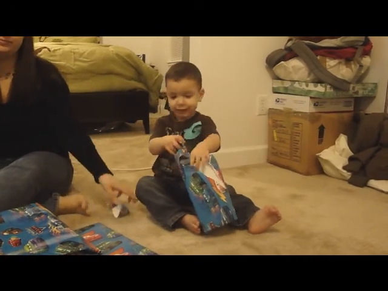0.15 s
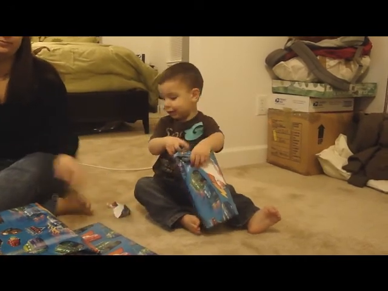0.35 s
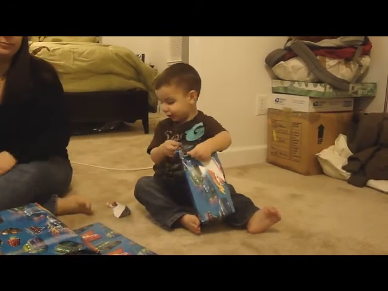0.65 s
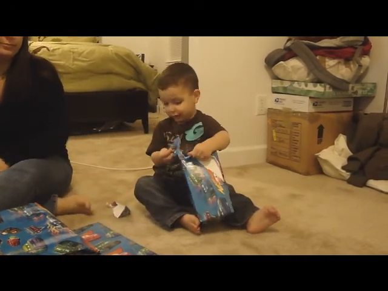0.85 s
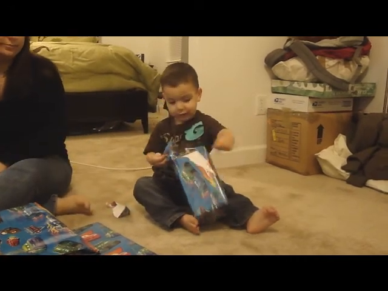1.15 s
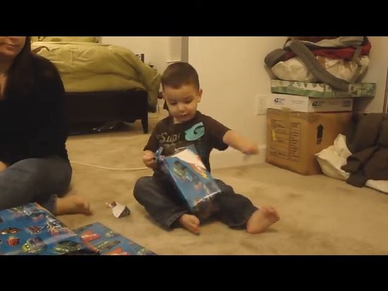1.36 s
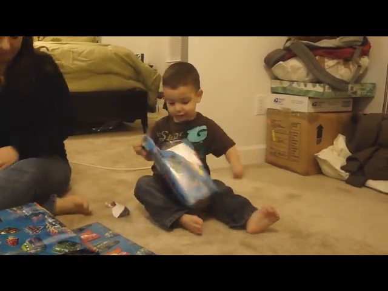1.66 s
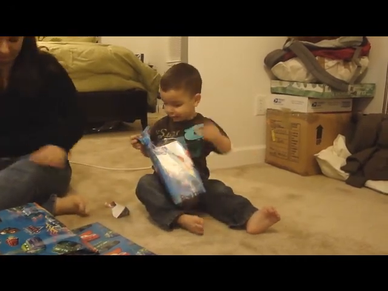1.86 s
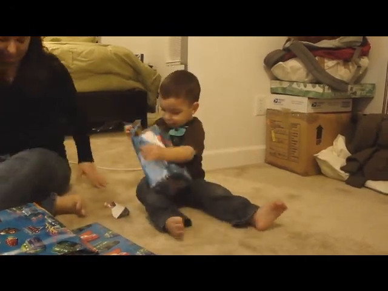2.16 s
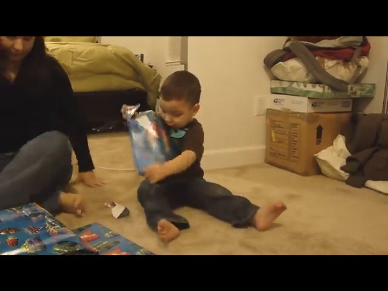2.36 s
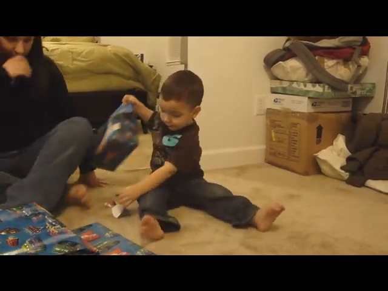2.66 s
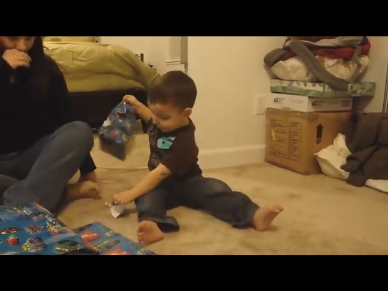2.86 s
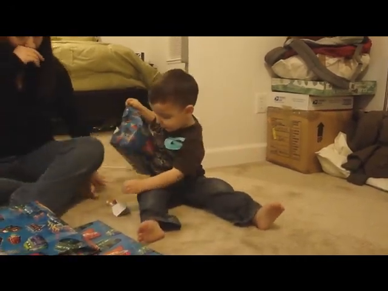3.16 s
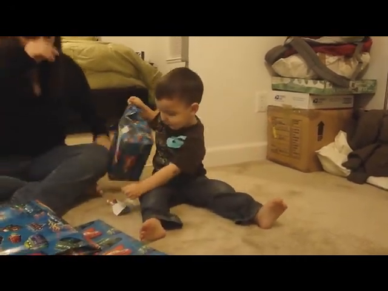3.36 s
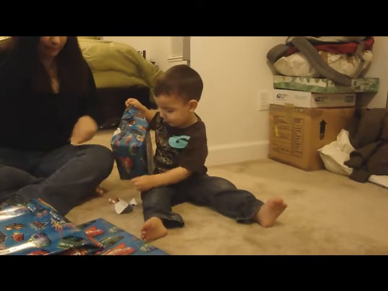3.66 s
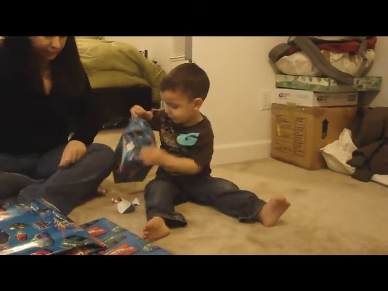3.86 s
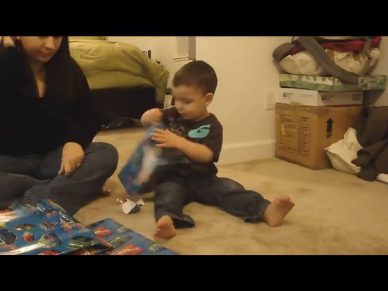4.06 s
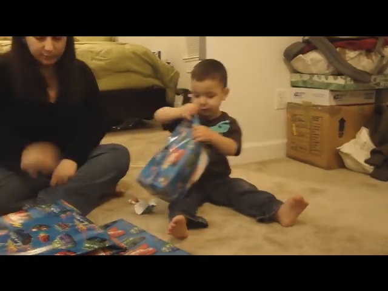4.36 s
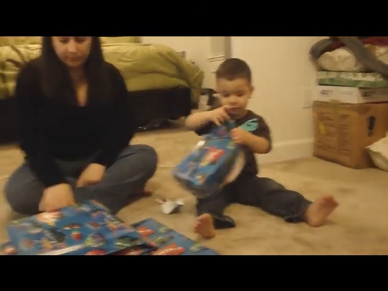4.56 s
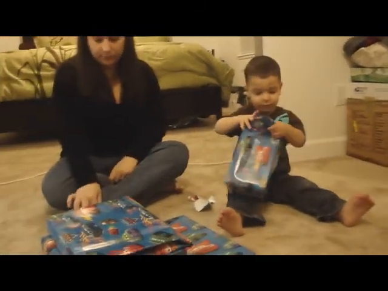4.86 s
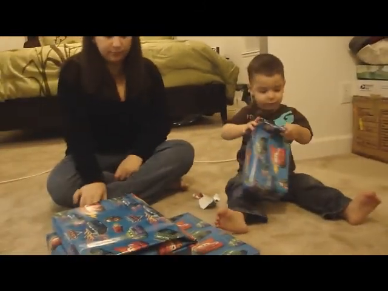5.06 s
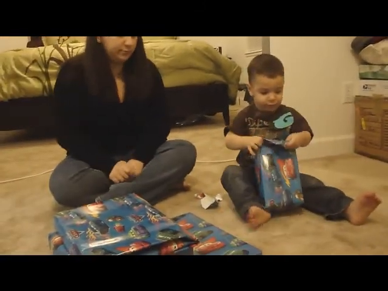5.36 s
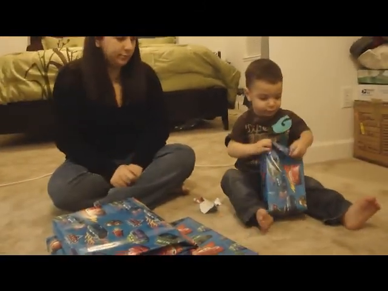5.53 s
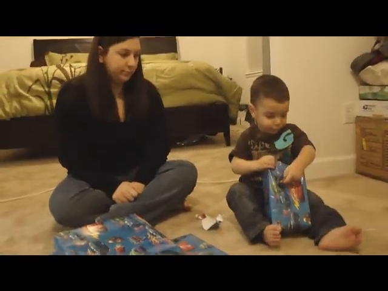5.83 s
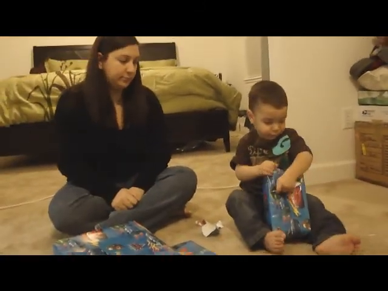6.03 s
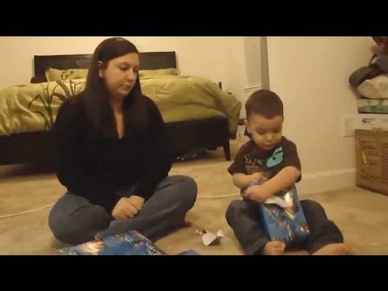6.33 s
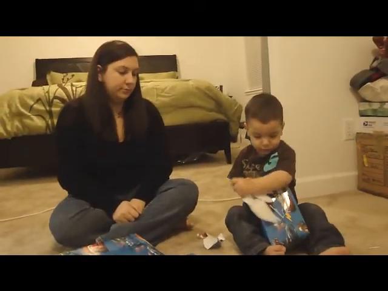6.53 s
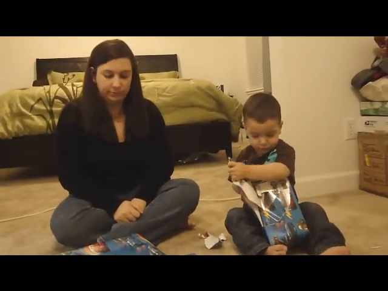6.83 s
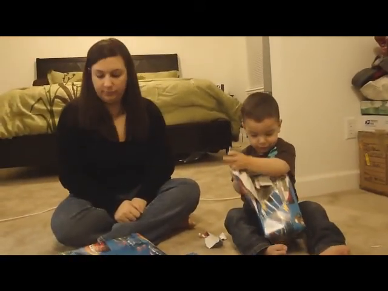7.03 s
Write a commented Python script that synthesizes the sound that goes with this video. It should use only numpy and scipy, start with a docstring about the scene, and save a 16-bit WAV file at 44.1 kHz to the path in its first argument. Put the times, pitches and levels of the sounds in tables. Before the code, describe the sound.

In a small carpeted bedroom, stiff wrapping paper is worked off a cardboard box about two metres from a small microphone. Sharp snaps and a short bright rip come in the first second or so, then sparse quiet crinkles and box knocks, then busier creasing that builds into dense, fizzing tears at the end. Faint room hiss lies beneath.

```python
"""Tearing gift paper off a box

A carpeted bedroom: paper is pulled, crinkled and torn off a cardboard box, two metres from a camera's microphone.
Single creases snap as short noise jolts with a ringing patch, over a crackle of many small noise ticks.
The box booms under the paper as dull crackle, and knocks ring its walls as decaying sines.
The room answers after a short gap with echoes and a sparse tail; quiet air is filtered noise."""
import sys
import numpy as np
from scipy import signal
from scipy.fft import rfft, irfft, next_fast_len
from scipy.io import wavfile
from scipy.ndimage import uniform_filter1d

SR = 44100
rng = np.random.default_rng(int(sys.argv[2]) if len(sys.argv) > 2 else 0)


def digitize_waveform(pressure):
    """Quantize a signal to 16-bit integers and store it at the path in sys.argv[1].

    Rows of a 2-D input are taken as channels; values are limited to [-1, 1].
    """
    field = np.atleast_2d(pressure).T
    bounded = np.clip(field, -1, 1)
    quanta = np.round(bounded * 32767).astype(np.int16)
    wavfile.write(sys.argv[1], SR, quanta)


def decibels_to_gain(level_db):
    """Convert a level in decibels to a linear amplitude gain (20 dB per decade)."""
    exponent = np.asarray(level_db, float) / 20
    return 10 ** exponent


N = 317079  # length in samples


def evened(x):
    """Scales to rms 1."""
    return x / np.sqrt(np.mean(x ** 2) + 1e-20)


def peaked(x):
    """Scales to peak 1."""
    return x / abs(x).max()


def read(points, hz):
    """Reads a table on a log-frequency axis."""
    f, value = np.transpose(points)
    return np.interp(np.log(hz + 1), np.log(f + 1), value)


def add(mix, s, sound):
    """Mixes a sound in at a time in seconds."""
    part = mix[round(s * SR):][:len(sound)]
    part += sound[:len(part)]


def coloured(x, points):
    """Filters by a spectrum table."""
    size = next_fast_len(len(x))
    gain = decibels_to_gain(read(points, np.fft.rfftfreq(size, 1 / SR)))
    return irfft(rfft(x, size) * gain, size)[:len(x)]


def burst(noise, t60):
    """A sudden release: noise that starts within 0.17 ms and dies."""
    t = np.arange(len(noise)) / SR
    return noise * decibels_to_gain(-60 * t / t60) * np.minimum(t / 0.00017, 1)


def ring(x, hz, width):
    """One resonance of gain 1 at its pitch: shifted to 0 Hz, smoothed, shifted back."""
    turn = np.exp(2j * np.pi * hz * np.arange(len(x)) / SR)
    r = np.exp(-np.pi * width / SR)
    return 2 * (turn * signal.lfilter([1 - r], [1, -r], x / turn)).real


# the hands at work on the paper, levels before the flurries are added:
# start_s [s], sheet_db (crackle of the sheet) [dB], rustle_db (carried by the box) [dB],
# fizz_db (fine fizz of tearing fibres) [dB]
HANDS = [(0.0, -39, -44.5, -47.5), (0.46, -54, -52, -55), (0.56, -48.5, -54, -58), (0.78, -46, -49.5, -57),
         (0.92, -48, -42.5, -51), (1.04, -32.5, -43.5, -34), (1.34, -55.5, -53, -59), (1.64, -54, -57, -66),
         (1.96, -52, -54.5, -58.5), (2.18, -42, -47, -46.5), (2.44, -43, -46, -60), (2.62, -44, -46, -68),
         (2.76, -56, -62, -66), (3.0, -48.5, -45, -57), (3.18, -44.5, -51, -64), (3.36, -54.5, -54.5, -70),
         (3.54, -53, -52.5, -66), (3.96, -58, -66.5, -67), (4.16, -59, -50, -60), (4.31, -39, -45.5, -49),
         (4.44, -45.5, -47.5, -59), (4.93, -48.5, -56, -53), (5.17, -49, -51, -55),
         (5.41, -43.5, -46.5, -56), (5.77, -44.5, -53.5, -50), (5.89, -32, -40, -36),
         (6.03, -40.5, -49, -46), (6.15, -36.5, -54, -41), (6.27, -34, -43.5, -39), (6.47, -33.5, -40, -29),
         (6.57, -31, -37.5, -29), (6.81, -41.5, -47, -46), (7.03, -41.5, -51, -46), (7.19, -28, -40, -30.5)]


def hands():
    """Levels of sheet, box and fibres as the hands work the paper, gliding between table rows."""
    s, *levels = np.transpose(HANDS)
    return np.array([np.interp(np.arange(N) / SR, s, level) for level in levels])


# share of the flurry in box and fibres, swelling and dying time
FLURRY_BOX_DB, FLURRY_FIZZ_DB, FLURRY_RISE_S, FLURRY_T60_S = 1.5, -1, 0.0029, 0.29
FLURRY_ALIKE = 0.51  # how far the flurry takes on the colour of its snap, 0 to 1


def flurries():
    """Power in sheet, box and fibres that swells just after each placed snap, in its colour, and dies away."""
    kicks = np.zeros((3, N))
    for s, db, hz, low_db, high_db, flurry_db in PLACED_SNAPS:
        box_db = FLURRY_BOX_DB + FLURRY_ALIKE * low_db
        fizz_db = FLURRY_FIZZ_DB + FLURRY_ALIKE * high_db
        colour_db = np.array([0, box_db, fizz_db])
        kicks[:, round(s * SR)] += decibels_to_gain(db + flurry_db + colour_db) ** 2
    dying = signal.lfilter([1], [1, -decibels_to_gain(-120 / (FLURRY_T60_S * SR))], kicks)
    keep = np.exp(-1 / (FLURRY_RISE_S * SR))
    return signal.lfilter([1 - keep], [1, -keep], dying)


def crackle(per_s, spread_db, clump_db, t60, ring_share, count=32):
    """Countless small creases, in clumps; each patch of paper has its own ring."""
    clumps = evened(uniform_filter1d(uniform_filter1d(rng.standard_normal(N), 300), 300))
    size = decibels_to_gain(spread_db * np.minimum(rng.exponential(1, N), 4) + clump_db * clumps)
    size *= rng.random(N) < per_s / SR
    patch = rng.integers(0, count, N)
    share = np.clip(ring_share, 0, 1)
    out = np.zeros(N)
    for k, hz in enumerate(np.geomspace(250, 10000, count)):
        tick = burst(rng.standard_normal(600), t60)  # cut off after 14 ms
        ringing = ring(tick, 4000 * (hz / 4000) ** 0.62, 700)  # pitches drawn in towards 4 kHz
        tick = (1 - share) * evened(tick) + share * evened(ringing)
        out += signal.oaconvolve(size * (patch == k), evened(tick))[:N]
    return out


# colour of the crackle off the sheet: pitch_hz [Hz], level_db per Hz [dB]
SHEET_COLOUR = [(700, -100), (1200, -18.5), (1700, 0), (2500, 3), (3500, 3.5), (4500, 3), (6000, -7.5)]
# colour of the rustle carried by the box: pitch_hz [Hz], level_db per Hz [dB]
RUSTLE_COLOUR = [(60, -57), (120, -11), (200, 1), (350, 7.5), (700, 6.5), (1200, 9), (1700, -1.5),
                 (2500, -91)]
# colour of the fizz of tearing fibres: pitch_hz [Hz], level_db per Hz [dB]
FIZZ_COLOUR = [(3000, -35.5), (4500, 0), (5500, 5), (7000, 3), (9000, 3), (11000, -4), (13000, -24)]
# a strong pull rips fibres so fast that their fizz turns dense and even
TEAR_FROM_DB, TEAR_SPAN_DB = -42, 10


def handling():
    """Fine crackle of the sheet, fizz of fibres that turns dense in tearing, and duller, longer crackle of the box."""
    levels = hands()
    sheet, rustle, fizz = np.sqrt(decibels_to_gain(levels) ** 2 + flurries())
    fine = evened(crackle(per_s=2500, spread_db=2.0, clump_db=2.0, t60=0.0068, ring_share=0.56))
    dense = evened(crackle(per_s=7400, spread_db=5.0, clump_db=1.2, t60=0.0057, ring_share=0.4, count=12))
    longer = evened(crackle(per_s=700, spread_db=6.5, clump_db=3.5, t60=0.056, ring_share=0, count=12))
    tearing = np.clip((levels[2] - TEAR_FROM_DB) / TEAR_SPAN_DB, 0, 1)
    fibres = np.sqrt(1 - tearing) * fine + np.sqrt(tearing) * dense
    box = fine + 1.14 * longer
    return (sheet * evened(coloured(fine, SHEET_COLOUR))
            + fizz * evened(coloured(fibres, FIZZ_COLOUR))
            + rustle * evened(coloured(box, RUSTLE_COLOUR)))


# colour of the quiet room: pitch_hz [Hz], level_db per Hz [dB]
AIR_COLOUR = [(25, -17), (60, -13), (100, -9.5), (120, -0.5), (140, -5.5), (250, -0.5), (600, -3.5),
              (2000, -8), (4000, -6), (11000, -21.5)]


def air():
    """Steady hiss of the room and the microphone: filtered noise at rms -54 dB."""
    return decibels_to_gain(-54) * evened(coloured(rng.standard_normal(N), AIR_COLOUR))


# dying time of the bedroom: pitch_hz [Hz], t60_s [s]
ROOM_T60 = [(250, 0.53), (800, 0.27), (2500, 0.2), (6000, 0.044), (11000, 0.16)]
# first echoes off the walls: usual delay_s [s], level_db [dB]
WALL_ECHOES = [(.0022, -65), (.0086, -17), (0.0132, -13.5), (0.018, -28.5)]


def tail():
    """A few wall echoes, and sparse taps whose bands die at their own speed."""
    taps = np.zeros(SR // 2)
    at = np.arange(380, SR // 2 - 20, 20)  # the gap before the tail is about 9 ms
    taps[at + rng.integers(0, 20, len(at))] = rng.choice([-1., 1.], len(at))
    hz, t, z = signal.stft(taps, SR, nperseg=256)
    dying = decibels_to_gain(-60 * t / read(ROOM_T60, hz)[:, None])
    out = signal.istft(z * dying, SR, nperseg=256)[1]
    out *= decibels_to_gain(-9.5) / np.linalg.norm(out)
    for s, db in WALL_ECHOES:
        out[round(s * SR * rng.uniform(.93, 1.07))] += decibels_to_gain(db)
    return out


def room(x, count=5):
    """Creases break all over the moving sheet, so each moment reaches the walls by other paths."""
    turn = np.arange(N) / SR / .045  # fades to the next tail every 45 ms
    out = np.zeros(N)
    for k in range(count):
        away = (turn - k + count / 2) % count - count / 2
        fade = np.cos(np.pi / 2 * np.clip(away, -1, 1))
        out += signal.fftconvolve(x * fade, tail())[:N]
    return out


# single creases placed by time, loud and faint: start_s [s], peak_db of the jolt before the box push [dB],
# pitch_hz of the freed patch [Hz], low_db (push on the box, mostly under 1.5 kHz, against the jolt) [dB],
# high_db (over 5.5 kHz, against the ringing sheet) [dB], flurry_db (crackle set off, against the jolt) [dB]
PLACED_SNAPS = [(0.0564, -15, 3180, -26, -9.5, -22), (0.0847, -6.5, 6050, -44, -10, -36),
                (0.2504, -20.5, 2730, -8, -10, -20.5), (0.2984, -17.5, 2980, -25, -1, -17),
                (0.3171, -12, 2860, -29, -5, -18.5), (0.3503, -11.5, 3100, -32, -12, -24),
                (0.3709, -7, 2900, -16, -1.5, -23), (0.4364, -17, 2460, -12, -7, -18),
                (0.4678, -18, 5050, -26, -20, -19.5), (0.4894, -23, 4320, -18, -19, -26),
                (0.5242, -17, 2160, -18, -7, -19), (0.5922, -19, 2200, -11, -4, -36),
                (0.713, -18, 3930, -13.5, -11, -18), (0.7545, -13.5, 3700, -22, -12, -23),
                (0.8034, -15.5, 3730, -9, -4, -21), (0.8103, -10, 3080, -23, -6, -41),
                (0.849, -16, 5850, -21, -9, -20), (0.8595, -18, 4130, -16, -10, -26),
                (0.907, -10, 1580, -27, 0, -24.5), (0.9349, -15, 1440, -24, -20, -31),
                (0.9732, -9, 4540, -25, -17, -27), (0.981, -23, 1800, -12, -9, -28),
                (1.0108, -5.5, 5860, -22, -15, -20), (1.0804, -6.5, 5390, -24, -4, -28),
                (1.0884, -10, 5310, -22, -9, -40), (1.0989, -9.5, 6200, -27, -10, -40),
                (1.2072, -26, 4060, -14, -13, -17), (1.2164, -20.5, 3400, -15, -11, -20.5),
                (1.3132, -14, 5200, -26, -18, -28), (1.3404, -20.5, 6190, -26, -20, -30),
                (1.3977, -29, 5060, -7, -23, -21), (1.4127, -30, 3820, -21, -22, -24),
                (1.5429, -21, 5700, -21, -4, -23), (1.5974, -27, 5380, -18, -15, -26),
                (1.645, -16, 5700, -21, -11, -27), (1.6846, -18, 2090, -15, -21, -20),
                (1.7192, -18.5, 3830, -9, -36, -32), (1.8507, -22.5, 2010, -31, -9, -28),
                (1.8896, -29, 2960, -13, -23, -31), (1.941, -23.5, 3380, -20, -1, -32),
                (1.9894, -15, 4050, -37, -10, -29), (2.0154, -21, 4560, -23, 4, -30),
                (2.0328, -17.5, 5530, -14, -8, -25), (2.148, -20, 4770, -23, -4, -35),
                (2.2114, -38, 3070, -16, -15, -40), (2.2587, -31, 2820, -15, -18, -32),
                (2.2794, -18.5, 1430, -8, -21, -19), (2.499, -18, 2000, -19, -4, -29),
                (2.5908, -13, 2930, -25, -19, -28), (2.6363, -16.5, 2880, -12, -16, -23.5),
                (2.7106, -17.5, 2390, -10.5, -10, -29), (2.7424, -11.5, 3910, -20, -3, -28.5),
                (2.9497, -29.5, 2340, -17, -15, -17), (3.026, -11, 6360, -21, -19, -31),
                (3.0354, -21.5, 3720, -22, -11, -19), (3.099, -37, 2950, -20, -14, -29),
                (3.1453, -24.5, 2500, -16, -18, -18), (3.1896, -32, 2390, -17, -21, -28),
                (3.2977, -26.5, 1680, -23, -8, -19), (3.3577, -14, 1620, -19, -13, -30),
                (3.5053, -27, 2440, -14, -24, -21), (3.5125, -24, 2460, -18, -28, -21),
                (3.5234, -26, 2390, -16, -21, -26), (3.5332, -15, 3300, -29, -3, -28.5),
                (4.1064, -34, 2290, -22, -12, -12), (4.1425, -29.5, 1610, -6, -10, -14),
                (4.2617, -20.5, 2500, -5.5, -16, -24), (4.2808, -13, 1540, -15, -6, -32),
                (4.3044, -15, 2920, -11, -13, -35), (4.341, -25.5, 2410, -19, -16, -26),
                (4.3906, -17.5, 2860, -11, -11, -24), (4.3954, -18, 3040, -15, -22, -20),
                (4.4576, -13, 4800, -29, -9, -25), (4.4674, -16.5, 5060, -21, -13, -19),
                (4.5324, -20.5, 1840, -5, 0, -32), (4.5506, -17.5, 5800, -26, -9, -29),
                (4.575, -21, 1760, -11, -20, -28), (4.6245, -19.5, 3060, -14, -10, -36),
                (4.662, -21, 2480, -13, -4, -29), (4.6944, -13, 2710, -23, -2, -37),
                (4.7556, -13.5, 4140, -10, -40, -25), (4.8461, -13.5, 1610, -16, -22, -31),
                (4.8724, -20, 4490, -14, -16, -26), (4.8824, -16.5, 1870, -15, -20, -25.5),
                (4.9374, -15.5, 5100, -22, -20, -27), (5.0095, -31, 3200, -11, -14, -26),
                (5.1113, -19, 3320, -22, -9, -22), (5.1474, -21, 1440, -17, -28, -17),
                (5.156, -20.5, 3140, -19, -28, -32), (5.1916, -24, 3610, -8, -21, -30),
                (5.214, -32, 1910, -17, -17, -31), (5.265, -16, 4230, -31, -1, -29.5),
                (5.2704, -17, 2450, -23, -18, -33), (5.3184, -32, 1860, -9, -12, -33),
                (5.3477, -15.5, 1420, -18, -6, -20), (5.4084, -24, 1780, -19, -8, -33),
                (5.4477, -20.5, 2890, -31, -6, -15), (5.5109, -13, 3240, -29, -2, -18.5),
                (5.5304, -17, 1980, -30, -16, -26), (5.5411, -11.5, 3100, -26, -6, -19),
                (5.5941, -12, 4340, -29, -5, -19.5), (5.6465, -10, 2070, -41, -12, -22),
                (5.6965, -17, 4540, -30, -24, -18), (5.722, -14, 4080, -33, -19, -35),
                (5.7758, -29, 4700, -11, -6, -32), (5.8066, -3, 2270, -36, -23, -27.5),
                (5.8387, -13, 3000, -27, -3, -18.5), (5.8797, -9, 3370, -31, -21, -30),
                (5.8874, -19, 3140, -26, -18, -28), (5.907, -9.5, 2360, -32, -23, -23),
                (5.9144, -16, 2440, -32, -19, -26), (5.9828, -18, 2150, -19, -5, -21),
                (6.011, -12.5, 1990, -31, -17, -21), (6.0264, -19, 1950, -22, -15, -28),
                (6.0904, -14.5, 4170, -27, 3, -20), (6.108, -12, 2550, -26, -10, -21),
                (6.1204, -12.5, 2680, -22, -18, -24), (6.1394, -11, 2300, -13, -16, -31),
                (6.1614, -18, 3990, -20, -10, -24), (6.1784, -12, 2000, -15, -6, -37),
                (6.1966, -15, 2500, -30, 8, -17), (6.2354, -18, 2730, -33, -16, -26),
                (6.2612, -13, 2390, -24, -15, -22), (6.3554, -12, 5210, -22, -11, -33),
                (6.3875, -9, 5530, -17, -19, -37), (6.6374, -10.5, 4250, -19, -12, -26),
                (6.6763, -18, 4550, -23, -13, -30), (6.7408, -12, 5200, -23, -1, -19.5),
                (6.8504, -23, 1820, -16, -15, -33), (6.8943, -13, 5100, -33, -6, -43),
                (6.9252, -28, 5540, -11, -14, -46), (6.9671, -18.5, 2900, -28, -18, -30),
                (7.0344, -18, 2020, -18, -14, -18), (7.1067, -12.5, 5380, -32, -14, -16.5)]
RING_GAIN, RING_Q = 4, 5  # the freed patch rings over the broad jolt


def snaps(rows):
    """A crease flips: one sharp jolt with a ragged end, the ring of the freed patch, a push on the box."""
    out = np.zeros(N)
    noise = rng.standard_normal((500, 800))
    low = signal.butter(2, [450, 1500], "band", fs=SR)
    middle = signal.butter(2, [1500, 5500], "band", fs=SR)
    high = signal.butter(2, [5500, 12000], "band", fs=SR)
    for (s, db, hz, low_db, high_db, *_), row in zip(rows, noise):
        crack = 0.18 * burst(row, 0.016)
        crack[24] += np.sign(row[0])  # the jolt itself, one sample up or down
        patch = RING_GAIN * ring(crack, hz, hz / RING_Q)
        sheet = peaked(signal.filtfilt(*middle, crack) + patch)
        edge = decibels_to_gain(high_db) * peaked(signal.filtfilt(*high, crack))
        push = decibels_to_gain(low_db) * peaked(signal.lfilter(*low, crack))
        add(out, s, decibels_to_gain(db) * (peaked(sheet + edge) + push))
    return out


# further creases drawn by chance: how often, how far over the crackle, how uneven
CHANCE_PER_S, CHANCE_OVER_DB, CHANCE_SPREAD_DB = 34, 7, 4
# their middle pitch and its spread, usual low and high parts and the spread of both
CHANCE_HZ, CHANCE_OCTAVES, CHANCE_LOW_DB, CHANCE_HIGH_DB, CHANCE_COLOUR_DB = 3180, 0.74, -13.5, 1.5, 4.5


def chance_snaps(count=500):
    """Rows like the placed snaps, drawn by chance; their strength follows the crackle of the sheet."""
    s = np.cumsum(rng.exponential(1, count)) / CHANCE_PER_S
    size = rng.exponential(1, count)
    tone, low, high = rng.standard_normal((count, 3)).T
    sheet_db = np.interp(s * SR, np.arange(N), hands()[0])
    db = sheet_db + CHANCE_OVER_DB + CHANCE_SPREAD_DB * np.minimum(size, 3)
    hz = np.clip(CHANCE_HZ * 2 ** (CHANCE_OCTAVES * tone), 1400, 8000)
    low_db = CHANCE_LOW_DB + CHANCE_COLOUR_DB * low
    high_db = CHANCE_HIGH_DB + CHANCE_COLOUR_DB * high
    rows = np.array([s, db, hz, low_db, high_db]).T
    return rows[s < N / SR]


# knocks on the box: start_s [s], peak_db [dB]
BOX_KNOCKS = [(0.373, -30.5), (1.996, -35), (3.149, -33), (3.3505, -22), (3.358, -23.5), (3.843, -33.5),
              (5.239, -33), (5.347, -27.5), (5.587, -35), (5.861, -46), (6.138, -29.5), (6.312, -30),
              (6.548, -33)]
# modes of the box walls: usual pitch_hz [Hz], usual level_db [dB], t60_s [s]
BOX_MODES = [(196, -12, 0.19), (252, 2, 0.078), (342, 4.5, 0.082), (424, 16, 0.024), (643, 11.5, 0.083),
             (776, -15, 0.0082), (1030, 6.5, 0.083), (1180, -13, 0.017), (1480, -10, 0.013),
             (1910, 4.5, 0.014)]
RATTLE_DB, RATTLE_T60_S = -12, 0.17  # contents of the box, rms at the start against the peak of the walls


def knocks():
    """A soft blow rings the box walls and shakes what is inside; where it lands changes the mix of modes."""
    out = np.zeros(N)
    t = np.arange(6000) / SR
    # each mode strays by about 2 dB and 4 % in pitch
    place = rng.standard_normal((len(BOX_KNOCKS), len(BOX_MODES), 2)) * [2, .04]
    band = signal.butter(2, [160, 2100], "band", fs=SR)
    rattle = signal.lfilter(*band, rng.standard_normal((len(BOX_KNOCKS), 6000)))
    for (s, db), row, noise in zip(BOX_KNOCKS, place, rattle):
        body = np.zeros(6000)
        for (hz, mode_db, t60), (stray_db, detune) in zip(BOX_MODES, row):
            dying = decibels_to_gain(mode_db + stray_db - 60 * t / t60)
            body += dying * np.sin(2 * np.pi * hz * (1 + detune) * t)
        body = peaked(body) + decibels_to_gain(RATTLE_DB) * burst(evened(noise), RATTLE_T60_S)
        soft = np.minimum(t / 0.00096, 1)  # the blow takes about 1 ms to land
        add(out, s, decibels_to_gain(db) * peaked(body * soft))
    return out


def scene():
    """Paper and box in the room."""
    dry = handling() + snaps(PLACED_SNAPS) + snaps(chance_snaps()) + knocks()
    return (dry + room(dry))[None]


def band_limit(x):
    """A steep low-pass at the top of the band."""
    return signal.sosfilt(signal.butter(12, 12230, fs=SR, output="sos"), x)


# band limit of a 22050 Hz sampling rate: pitch_hz [Hz], gain_db [dB]
BAND_LIMIT = [(20, 0), (10930, 0), (11050, -12), (11180, -25), (11350, -35), (11700, -46), (12200, -56),
              (22050, -70)]


def record(dry):
    """The small microphone drops the bass under 145 Hz; air joins in; a 22050 Hz sampling rate limits the band."""
    bass_cut = signal.butter(2, 145, "high", fs=SR, output="sos")
    thin = signal.sosfilt(bass_cut, dry[0])
    mix = coloured(thin + air(), BAND_LIMIT)[None]
    return band_limit(mix)


dry = scene()
out = record(dry)
digitize_waveform(out)
```